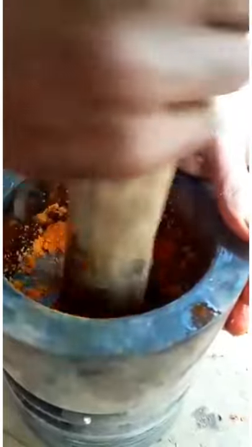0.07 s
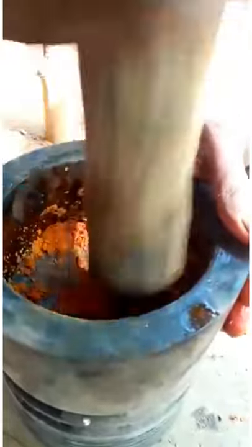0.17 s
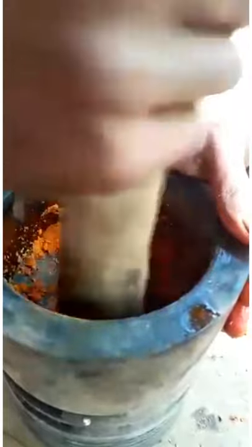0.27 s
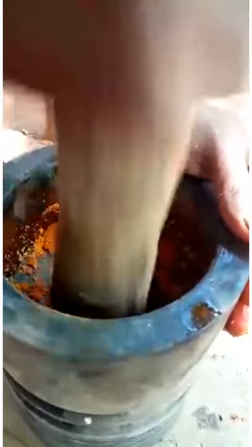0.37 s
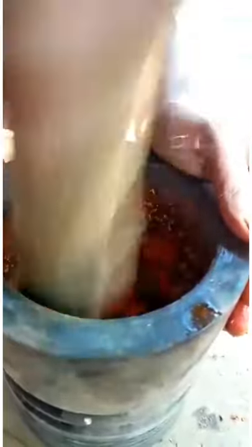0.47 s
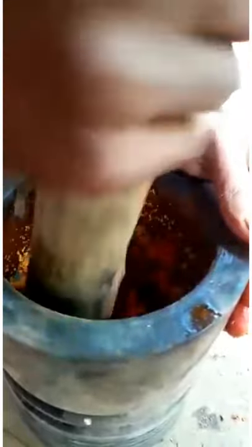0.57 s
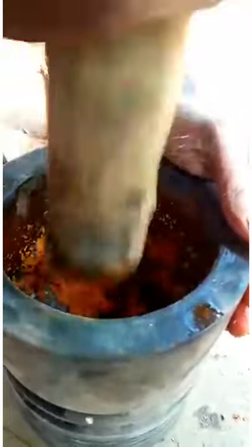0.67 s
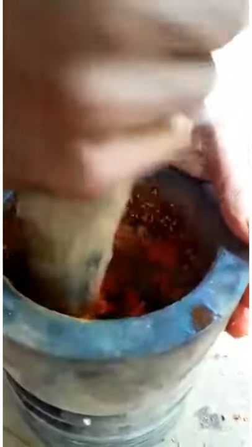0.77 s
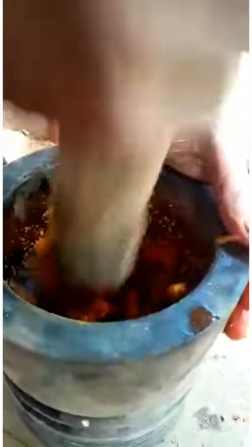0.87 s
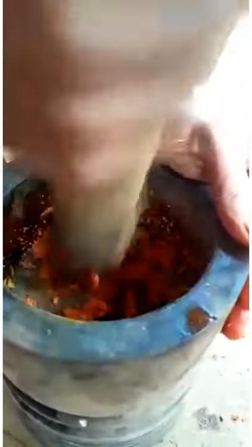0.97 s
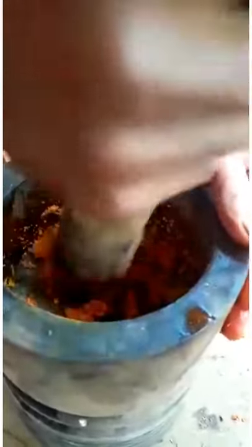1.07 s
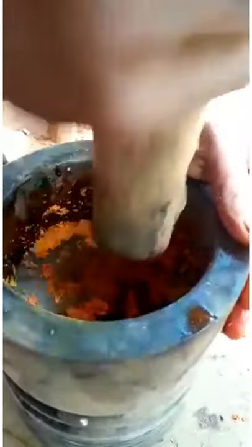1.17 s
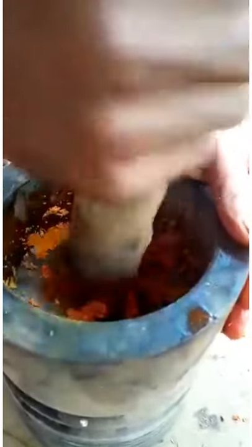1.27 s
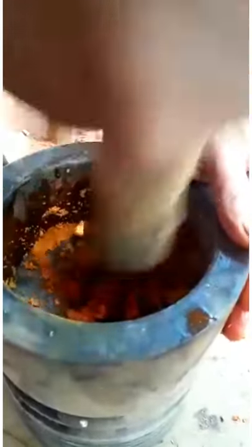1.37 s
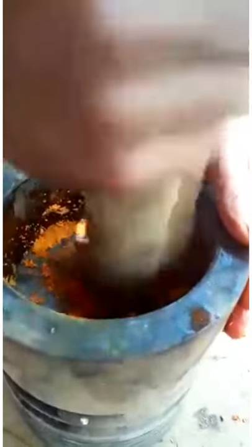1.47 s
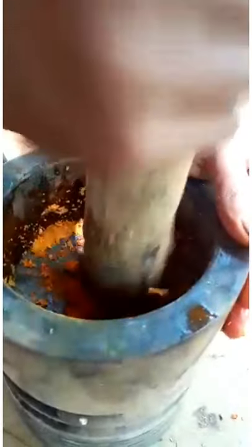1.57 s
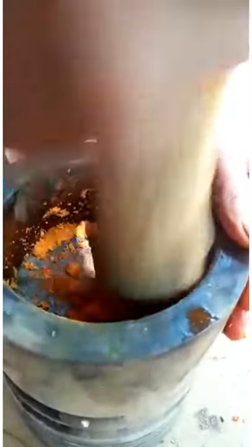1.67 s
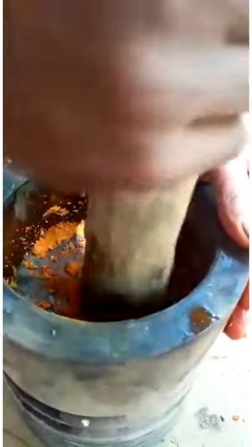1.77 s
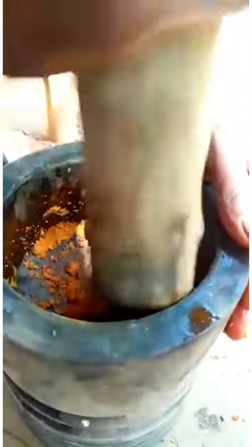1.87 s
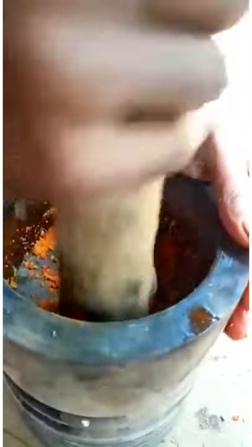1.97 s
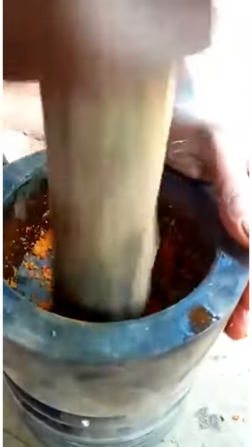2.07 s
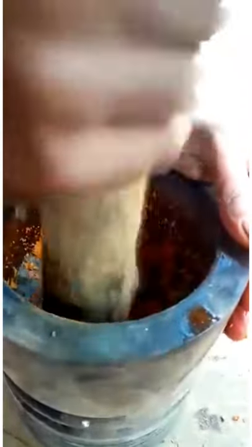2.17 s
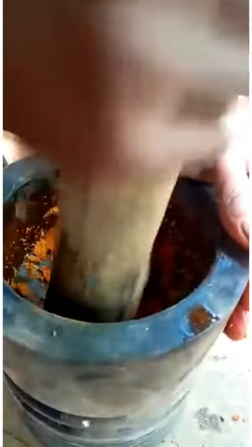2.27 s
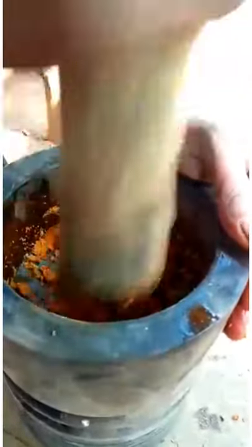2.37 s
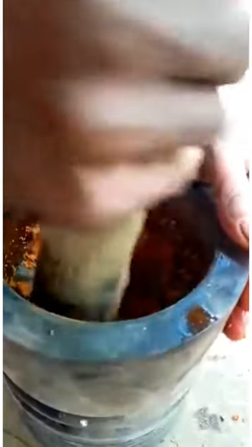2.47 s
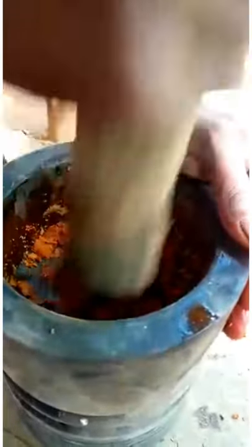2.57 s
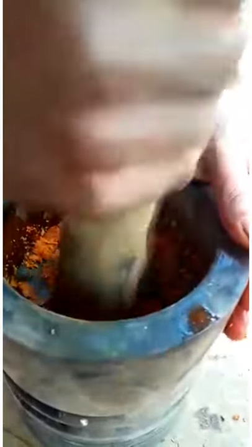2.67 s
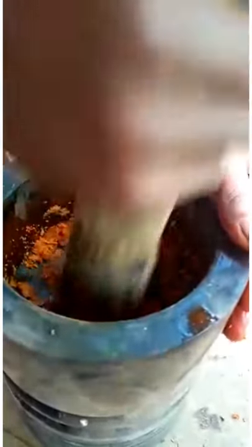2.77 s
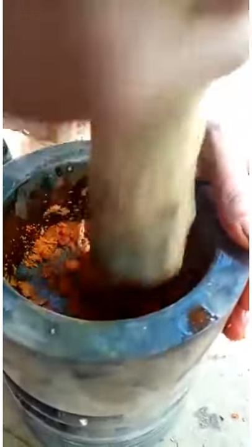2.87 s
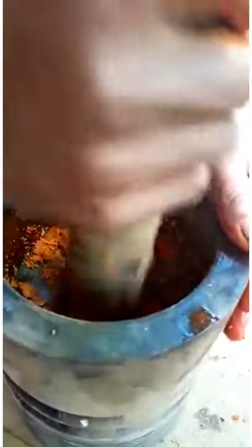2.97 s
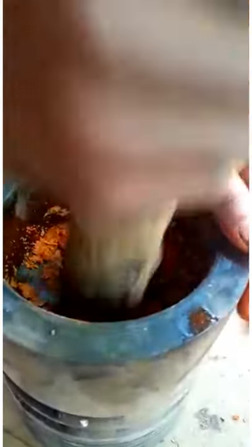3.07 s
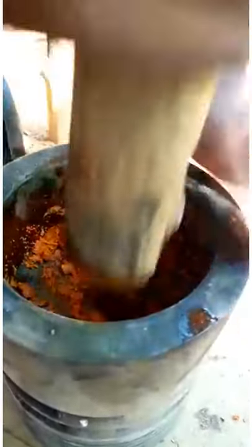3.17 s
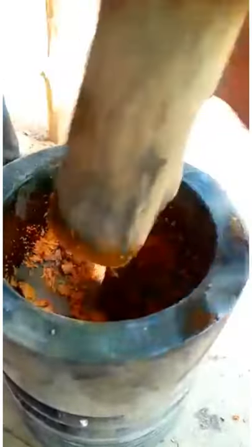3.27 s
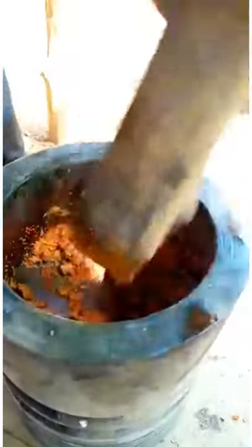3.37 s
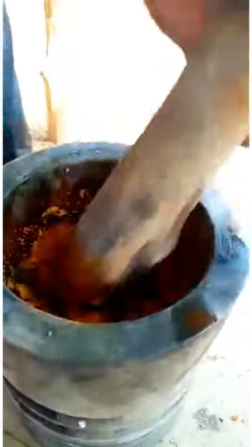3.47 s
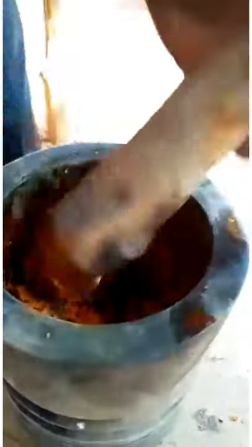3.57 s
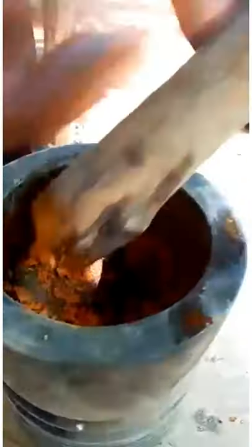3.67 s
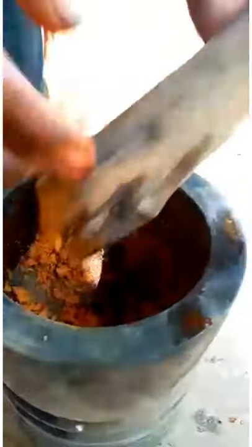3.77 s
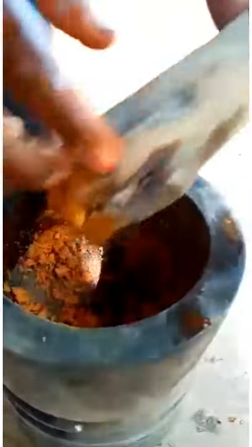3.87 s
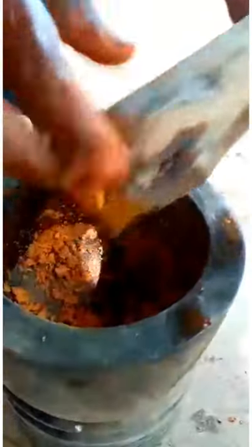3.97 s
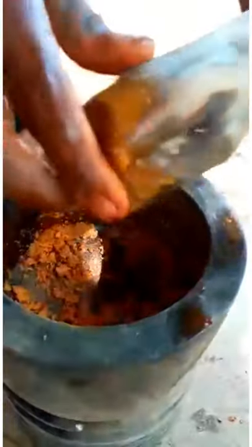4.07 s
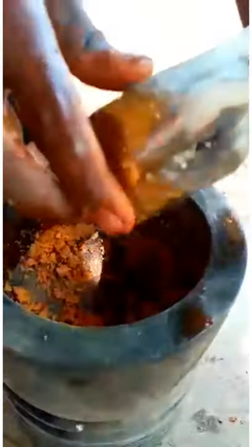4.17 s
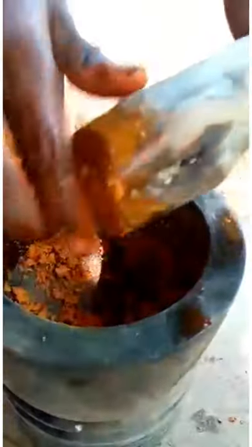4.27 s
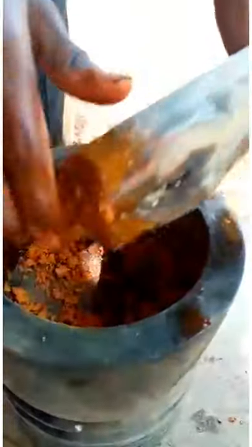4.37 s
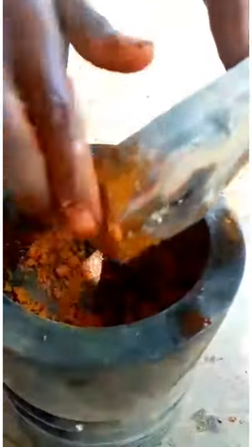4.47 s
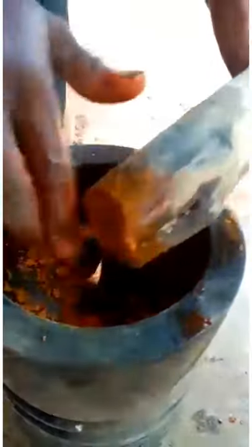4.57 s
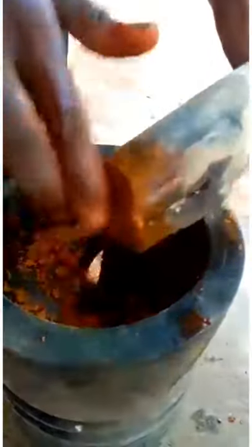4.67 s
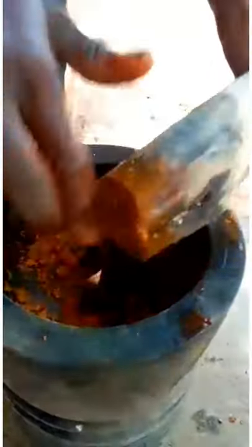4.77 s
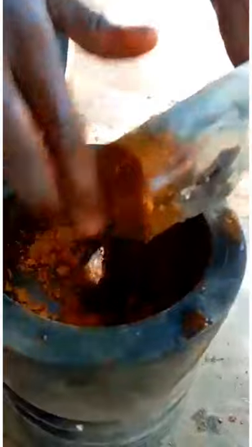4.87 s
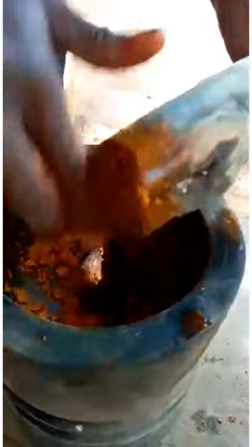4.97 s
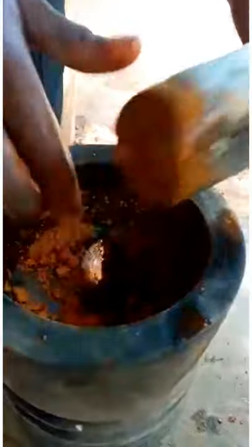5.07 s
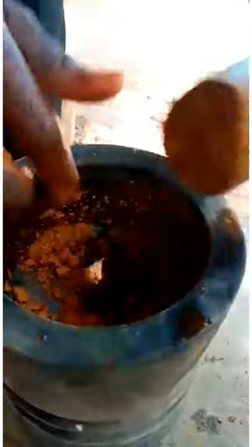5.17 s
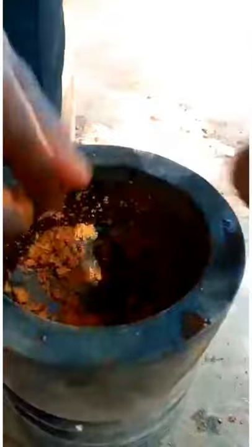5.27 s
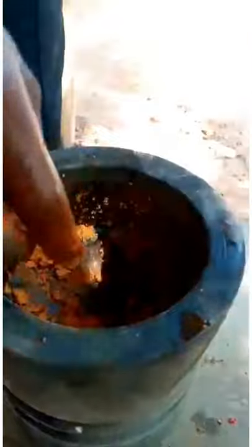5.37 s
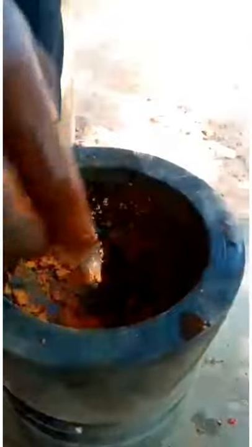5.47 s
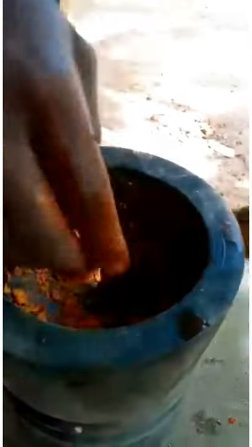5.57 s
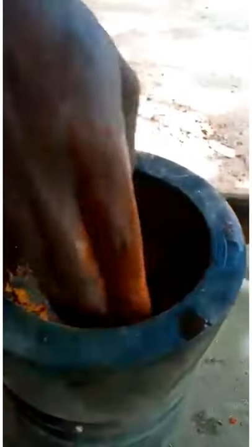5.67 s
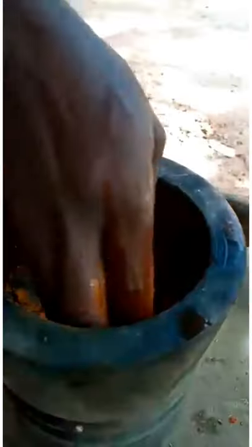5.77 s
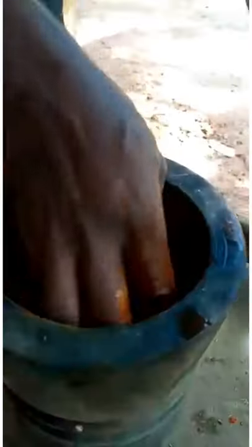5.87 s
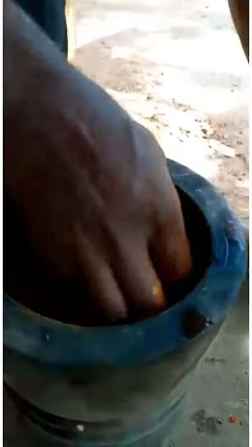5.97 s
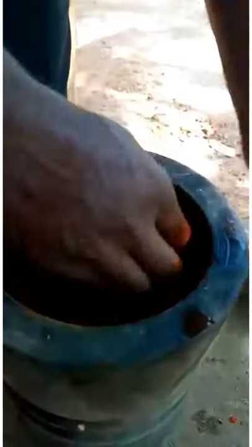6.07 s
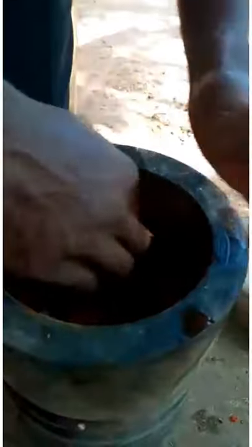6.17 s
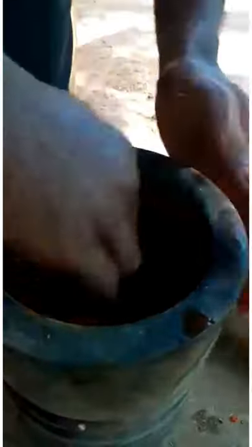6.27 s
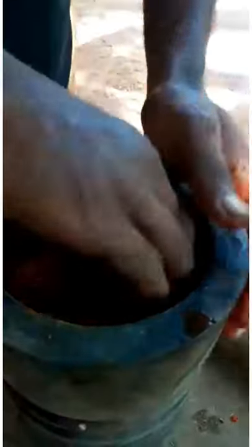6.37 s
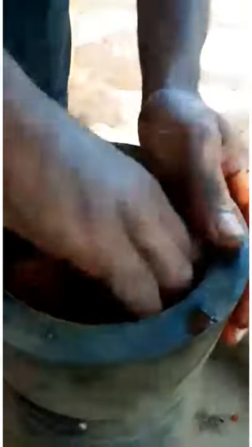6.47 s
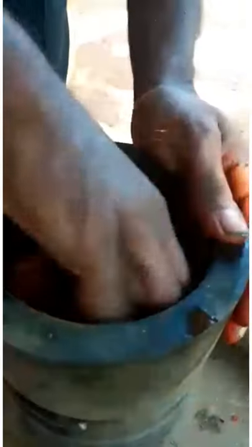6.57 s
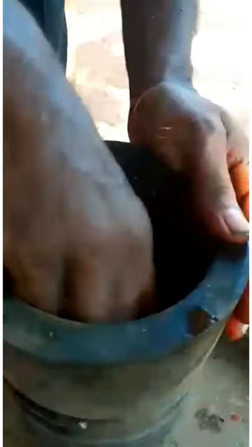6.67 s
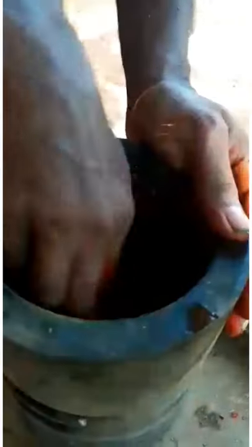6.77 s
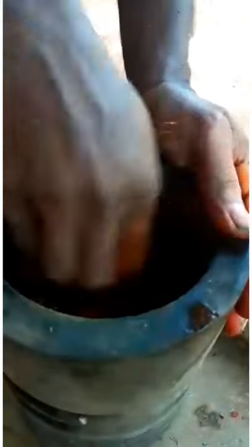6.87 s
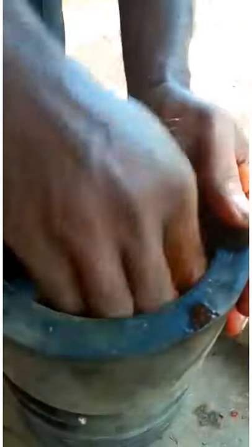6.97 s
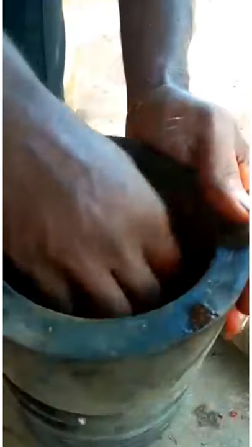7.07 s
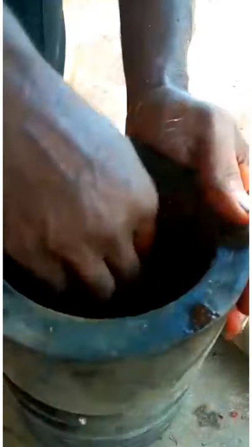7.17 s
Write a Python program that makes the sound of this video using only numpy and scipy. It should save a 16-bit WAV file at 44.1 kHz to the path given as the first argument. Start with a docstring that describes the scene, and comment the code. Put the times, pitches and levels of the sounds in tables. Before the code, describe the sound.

Close up, a wooden pestle pounds damp paste in a heavy mortar at about four blows a second, low thuds with wet squelches and small rim clacks. The final blows knock harder and crack. It stops; soft taps and faint wiping follow with thin distant birds. Then fingers scrape the bowl while the mortar knocks and rumbles on concrete. Hard nearby walls, slight phone hiss.

```python
"""Pestle and mortar

A wooden pestle pounds damp spice paste in a heavy wooden mortar, four blows a second, close to a phone
among nearby walls. Each blow is a swelling low sine plus damped modes and noise; paste cushions most blows
to a wet thud, and the last reach bare wood and crack. The pestle taps the rim, is set down and wiped, then
a hand scrapes the paste together in strokes of filtered noise and the mortar rocks on the concrete, struck
modes over a low rumble. Birds, narrow bands of noise with a gliding pitch, call faintly far off."""
import sys
import numpy as np
from scipy import signal
from scipy.fft import rfft, irfft, next_fast_len
from scipy.io import wavfile
from scipy.ndimage import uniform_filter1d, map_coordinates

SR = 44100
rng = np.random.default_rng(int(sys.argv[2]) if len(sys.argv) > 2 else 0)


def dump_mix(stems):
    """Bounce the given channels to the path in sys.argv[1] as a 16-bit WAV at rate SR."""
    frames = np.atleast_2d(stems).T  # one column per channel
    limited = np.clip(frames, -1, 1)  # hard clip at full scale
    pcm = np.round(limited * 32767).astype(np.int16)
    wavfile.write(sys.argv[1], SR, pcm)


N = 318827
T = np.arange(int(.6 * SR)) / SR  # time axis of one event, s
# low, middle and high modes: (from Hz, to Hz)
KNOCK_BAND, CLACK_BAND, CRACK_BAND = (0, 1280), (1280, 3600), (3600, 9000)


def amp(db):
    """Level to gain: 20 dB is a factor of ten in amplitude."""
    return 10 ** (np.asarray(db) / 20)


def unit(x):
    """Power normalisation: scale to rms 1."""
    return x / np.sqrt(np.mean(x ** 2) + 1e-20)


def punch(x):
    """Onset normalisation: scale a hit to rms 1 over its first 20 ms."""
    return x / np.sqrt(np.mean(x[:SR // 50] ** 2) + 1e-20)


def along(points, hz):
    """Logarithmic frequency scale: interpolate (Hz, value) points along it."""
    f, v = np.transpose(points)
    return np.interp(np.log(hz + 1), np.log(f), v)


def filtered(x, response):
    """Linear filtering: multiply the spectrum of x by a response of frequency."""
    n = x.shape[-1]
    m = next_fast_len(n + 8192)
    return irfft(rfft(x, m) * response(np.fft.rfftfreq(m, 1 / SR)), m)[..., :n]


def coloured(x, spectrum):
    """Spectral shaping: weight x by the given spectrum, then scale to rms 1."""
    return unit(filtered(x, lambda hz: amp(along(spectrum, hz))))


def fade(t60):
    """Exponential damping: a fall of 60 dB in t60 seconds."""
    return np.exp(-np.log(1000) * T / t60)


def grains(size, spread_db):
    """Impulsive noise: samples differ widely in size, like tiny crumbs and films breaking."""
    sizes = amp(spread_db * np.clip(rng.standard_normal(size), -2, 2))
    return unit(rng.standard_normal(size) * sizes)


def wobble(size, rate):
    """Slow random modulation: a smooth curve with rate knots a second."""
    knots = rng.standard_normal(8192)
    return map_coordinates(knots, [np.arange(size) * rate / SR], mode="wrap")


def gliding(hz, width_hz):
    """Quadrature modulation: noise within about width_hz either side of a moving centre hz."""
    band = filtered(rng.standard_normal((2, len(T))), lambda f: 1 / (1 + (f / width_hz) ** 4))
    turn = 2 * np.pi * np.cumsum(hz) / SR
    return unit(band[0] * np.cos(turn) + band[1] * np.sin(turn))


def gesture(s, length, attack, release):
    """Movement envelope: the gain builds up, holds for its length and dies away."""
    t = np.maximum(np.arange(N) / SR - s, 0)
    return (1 - np.exp(-(t / attack) ** 2)) * np.exp(-np.maximum(t - length, 0) / release)


def add(track, s, sound):
    """Superposition: mix a sound in at s seconds, which may lie before the start."""
    start = round(s * SR)
    sound, start = sound[max(-start, 0):], max(start, 0)
    track[start:start + len(sound)] += sound[:max(N - start, 0)]


def ring(modes, band, scatter_db):
    """Modal synthesis: damped modes within a band, at new strengths each hit, alternating in polarity."""
    chance = rng.standard_normal((len(modes), 2))
    total = 0
    for k, ((hz, db, t60), (strength, phase)) in enumerate(zip(modes, chance)):
        if band[0] <= hz < band[1]:
            gain = (-1) ** k * amp(db + scatter_db * strength)
            total = total + gain * fade(t60) * np.sin(2 * np.pi * hz * T + phase / 2)
    return punch(total)


SCATTER_DB = 2  # how much a mode's strength varies from hit to hit
BLUR_DB = -5


def contact(modes, band, spectrum, t60, rise):
    """Modal overlap: a few clear modes stand among many crowded ones that blur to noise."""
    blur = punch(coloured(rng.standard_normal(len(T)), spectrum) * fade(t60))
    return punch((ring(modes, band, SCATTER_DB) + amp(BLUR_DB) * blur) * (1 - np.exp(-T / rise)))


THUD_LOW_HZ = 80
# the ground and the nearest wall throw each thud back: delay_s, level_db
ECHOES = [(.0048, -5), (.0076, -12), (.0172, -11)]


def thud(hz, swell):
    """Heavy damping: a few low cycles swell, die and echo; the small bowl radiates little deep bass."""
    def push(t):
        return np.sin(2 * np.pi * hz * t) * (t / swell) ** 2 * np.exp(-t / swell)

    echoed = push(T) + sum(amp(db) * push(np.maximum(T - delay, 0)) for delay, db in ECHOES)
    return punch(signal.sosfilt(signal.butter(2, THUD_LOW_HZ, "high", fs=SR, output="sos"), echoed))


# decay of the near echoes: frequency_hz, t60_s
YARD = [(100, 0.15), (400, 0.44), (1000, 0.14), (2500, 0.48), (5000, 0.13), (12000, .12)]
# late echoes against the near ones: frequency_hz, level_db
FAR_WALLS = [(300, -31.5), (650, -24), (1000, -14.5), (1900, -19), (4000, -38)]
FAR_T60_S = 1.0
# colour of all the scattered echoes: frequency_hz, reflected_db
WALLS = [(60, -2.5), (250, 1.5), (500, -1), (1500, -3.5), (3000, -15), (5000, -12.5), (15000, -17)]


def reflected(hit, wet_db, delay):
    """Diffuse reverberation: a hit with scattered echoes, their near part decaying by frequency."""
    hz, t, z = signal.stft(rng.standard_normal(len(T)), SR, nperseg=256)
    near = np.exp(-np.log(1000) * t / along(YARD, hz)[:, None])
    far = amp(along(FAR_WALLS, hz))[:, None] * np.exp(-np.log(1000) * t / FAR_T60_S)
    tail = signal.istft(z * (near + far), SR, nperseg=256)[1][:len(T)]
    tail = filtered(tail, lambda f: amp(along(WALLS, f))) * (1 - np.exp(-(T / delay) ** 2))
    return hit + amp(wet_db) * signal.fftconvolve(hit, tail)[:len(T)]


# hollow tones of the bowl: pitch_hz, width_hz, level_db before BOWL_DB
BOWL = [(2290, 33, -3), (2640, 60, -9), (3110, 45, -8), (3330, 90, -6), (3780, 50, -9), (4090, 45, -5),
        (4250, 70, -3), (4760, 55, -8), (5520, 150, -6), (5740, 55, -5), (6260, 70, -5), (6620, 130, -6)]
BOWL_DB, OPEN_DB = 10, -6  # sound through the hollow tones, sound straight out


def hollow(x):
    """Cavity resonance: sounds made inside the bowl take on its hollow tones."""
    def tones(f):
        return sum(amp(db) * 1j * f * w / (hz * hz - f * f + 1j * f * w) for hz, w, db in BOWL)

    return filtered(x, lambda f: amp(OPEN_DB) + amp(BOWL_DB) * tones(f))


# relative spectrum of the hiss: frequency_hz, density_db (per Hz)
HISS = [(30, -6.5), (65, 7.5), (110, 6.5), (300, -8), (1000, -13), (2700, -9.5), (4500, -19.5),
        (6200, -15.5), (6750, 7), (7200, 4), (7700, -20), (8700, -16.5), (9900, -6.5), (11200, -31.5),
        (14000, -31.5), (15500, -33.5)]


def hiss():
    """Electronic noise: the phone's own steady hiss, with a band near 7 kHz."""
    return amp(-65.0) * coloured(rng.standard_normal(N), HISS)


# pestle on paste and wood: start_s, thud_db, knock_db, clack_db, crack_db, paste_db (for paste())
BLOWS = [(-.19, -15, -18, -23, -44, -34), (.052, -18, -33, -49, -41.5, -43.5),
         (0.2928, -19.5, -31.5, -38.5, -41.5, -50.5), (.533, -20, -21, -39.5, -47.5, -53),
         (.779, -19, -13.5, -26.5, -37.5, -50.5), (1.03, -19.5, -24, -35, -40, -51.5),
         (1.252, -35, -23, -33.5, -47, -81), (1.263, -18.5, -32, -42, -42.5, -46),
         (1.488, -19.5, -21, -30.5, -44, -47), (1.718, -22, -21.5, -37, -54.5, -50),
         (1.961, -22.5, -34, -43.5, -39.5, -56), (2.199, -20, -29, -41.5, -45.5, -45),
         (2.4507, -18, -19.5, -36, -29.5, -55), (2.7051, -18, -10, -13.5, -29.5, -47),
         (2.9513, -19, -11.5, -15, -23.5, -52)]
# modes of the mortar: pitch_hz, level_db, t60_s
MORTAR = [(457, -25, 0.25), (540, -10.5, 0.05), (650, -8.5, 0.07), (785, -0.5, 0.035), (858.3, -4.5, 0.018),
          (946.6, -4, 0.056), (1157.6, -14, 0.033), (1310, -9, 0.02), (1386, -12.5, 0.031),
          (1530, -5.5, 0.041), (1745, -10.5, .05), (1850, -22, 0.04), (1932, -17, 0.087),
          (2210, -10.5, 0.023), (2565, -14, .035), (2680, -10, .04), (3190, -14, .03), (3490, -20, .03),
          (3830, -18, .04), (4253, -16, .04), (4557, -17, .04), (5620, -28, 0.015), (6606, -7.5, .03)]
# relative spectrum of the blurred knock: frequency_hz, density_db (per Hz)
WOOD = [(250, -21), (500, -9), (720, -2), (930, -5), (1300, -13.5), (2000, -23.5), (4000, -66)]
# relative spectrum of the blurred clack: frequency_hz, density_db (per Hz)
EDGE = [(700, -27), (1400, 7), (2100, -4), (3000, -2), (4200, -12.5), (8000, -42)]
# relative spectrum of crushing and grit: frequency_hz, density_db (per Hz)
CRACK = [(1500, -9), (3500, 2), (6000, -2), (8000, -6), (11000, -10), (13000, -16.5), (15500, -12)]
# the thud rises in pitch as the paste thins and the wood knocks louder
CUSHIONED_HZ, BARE_HZ = 166, 226  # limits for the quietest and the loudest knocks
THIRD_BARE_DB, THINNING_DB = -22, 2  # knock level one third of the way up, and the slope's scale


def pounding():
    """Contact stiffness: thinner paste under the pestle gives a higher thud and more knock and crack."""
    out = np.zeros(N)
    for s, thud_db, knock_db, clack_db, crack_db, _ in BLOWS:
        bare = 1 / (1 + 2 * np.exp((THIRD_BARE_DB - knock_db) / THINNING_DB))
        hz = CUSHIONED_HZ + bare * (BARE_HZ - CUSHIONED_HZ)
        knock = amp(knock_db) * contact(MORTAR, KNOCK_BAND, WOOD, t60=0.15, rise=0.0003)
        clack = amp(clack_db) * contact(MORTAR, CLACK_BAND, EDGE, t60=0.049, rise=0.00039)
        crush = punch(coloured(grains(len(T), 2.6), CRACK) * fade(0.029))
        splitting = crush + amp(-15.0) * ring(MORTAR, CRACK_BAND, scatter_db=4.5)
        crack = amp(crack_db) * punch(splitting * (1 - np.exp(-T / 0.00065)))
        low = amp(thud_db) * thud(hz, swell=0.0014)
        # the wood speaks just before the thud
        add(out, s - .0005, reflected(knock + clack + crack, wet_db=-38, delay=.008))
        add(out, s + 0.0011, reflected(low, wet_db=-34.5, delay=0.028))
    return out


# long resonances of the mortar and the space round it: pitch_hz, gain_db, t60_s
STANDING = [(112.6, 2, 0.18), (176.2, -0.5, 0.42), (204, -6, 0.13), (283.6, 3.5, 0.14), (318, 0, 0.11),
            (358, 4, 0.48), (468, -2.5, 0.49), (636, -10.5, 0.7), (770, -10.5, 0.46), (970, -5.5, .36),
            (1147, -8, .35)]


def standing_waves(x, delay):
    """Resonance: the mortar and its space hum on at their own frequencies after each hit."""
    hum = 0
    for hz, db, t60 in STANDING:
        per_sample = 2 * np.log(1000) / (t60 * SR)  # makes the gain at resonance close to gain_db
        hum = hum + amp(db) * per_sample * fade(t60) * np.cos(2 * np.pi * hz * T)
    return signal.fftconvolve(x, hum * (1 - np.exp(-(T / delay) ** 2)))[:N]


# the pestle slides on the paste or pulls free of it: start_s, level_db (before a 1 dB lift and hollow())
SMACKS = [(0.083, -69), (0.316, -38.5), (0.87, -53.5), (1.11, -50), (1.339, -48.5), (1.575, -51.5),
          (1.946, -45), (1.971, -42), (2.012, -43.5), (2.276, -45.5), (3.005, -56)]
# relative spectrum of squeezed paste: frequency_hz, density_db (per Hz)
PASTE = [(400, -10.5), (1200, 18.5), (2500, 8), (4000, 2.5), (6500, -1), (8500, -2), (12500, -9),
         (15500, -11)]
SPIT_T60_S, SQUEEZE_ATTACK_S, SQUEEZE_LENGTH_S = 0.015, .008, 0.12
SMACK_ATTACK_S, SMACK_T60_S = .0022, 0.13
CLUMP_DB = 3  # squeezed paste gives way in clumps


def paste():
    """Film rupture: damp paste spits under the landing pestle, squeezes out and smacks as it lifts."""
    out = np.zeros(N)
    spit_spectrum = [(3000, -19.0), (9000, -1.0), (15500, -3)]
    for s, *_, paste_db in BLOWS:
        spit = punch(coloured(grains(len(T), 2.8), spit_spectrum) * fade(SPIT_T60_S))
        clumps = unit(amp(CLUMP_DB * wobble(len(T), rate=130)))
        squeeze = (1 - np.exp(-T / SQUEEZE_ATTACK_S)) * np.exp(-(T / SQUEEZE_LENGTH_S) ** 2) * clumps
        ooze = squeeze * coloured(grains(len(T), 8.7), PASTE)
        add(out, s, amp(paste_db) * (amp(3.5) * spit + ooze))
    for s, db in SMACKS:
        smack = coloured(grains(len(T), 12.0), PASTE) * fade(SMACK_T60_S)
        add(out, s, amp(db + 1) * punch(smack * (1 - np.exp(-T / SMACK_ATTACK_S))))
    return hollow(out)


# the side of the pestle meets the rim:
# start_s, thud_hz, thud_db, knock_db (before the glancing filter), clack_db, clack_upper_edge_hz
TAPS = [(0.535, 200, -60, -66, -28.5, 6100), (1.0244, 175, -30.5, -43, -40, 5000),
        (1.433, 202, -33, -45, -28.5, 7000), (1.451, 202, -41, -53, -41, 6000),
        (1.678, 231, -33.5, -38.5, -25.5, 7000), (1.903, 214.5, -34.5, -43, -33, 5000),
        (1.953, 159, -49.5, -47, -45, 6000), (3.578, 134, -26.5, -43.5, -46.5, 1470),
        (4.599, 180.2, -68.5, -78, -63.5, 1585), (4.818, 165, -34, -44, -51, 1600),
        (5.403, 152, -53.5, -73, -84, 1200)]
# modes of the pestle's shaft: pitch_hz, level_db, t60_s
PESTLE = [(1170, -9, .07), (1450, -7, .06), (1960, -4, .03), (2067, 1, .06), (2218, -7, .04),
          (2638, -5, .05), (3039, -12, .025), (3340, -15, .03), (3873, -16, .02), (4517, -18, .03),
          (5876, -22, .025)]
TAP_SWELL_S = .0015


def tapping():
    """Coupled bodies: the shaft's modes clack on the rim while the nudged mortar knocks and thuds."""
    out = np.zeros(N)
    knock_spectrum = [(300, 1.5), (550, 15.0), (1200, -16.0), (2500, -28.5)]
    clack_spectrum = [(900, 5.0), (2050, 10), (3300, -1), (7000, -12.5), (15000, -55)]
    glancing = signal.butter(2, 800, fs=SR, output="sos")  # a glancing touch is duller
    for s, hz, thud_db, knock_db, clack_db, edge_hz in TAPS:
        knock = amp(knock_db) * contact(MORTAR, KNOCK_BAND, knock_spectrum, t60=0.11, rise=0.00086)
        knock = amp(5.5) * signal.sosfilt(glancing, knock)
        clack = contact(PESTLE, (0, SR), clack_spectrum, t60=0.04, rise=0.00017)
        clack = signal.sosfilt(signal.butter(4, edge_hz, fs=SR, output="sos"), clack)
        low = amp(thud_db) * thud(hz, swell=TAP_SWELL_S)
        add(out, s, reflected(knock + amp(clack_db) * punch(clack) + low, wet_db=-42.0, delay=0.0027))
    return out


# bird notes, some pure, some hoarse:
# start_s, length_s, pitch_hz, level_db (before the swell), half_width (share of pitch), opening_slide_hz
BIRD = [(3.082, 0.3, 3790, -69.5, 0.0091, -52), (3.385, 0.2, 2790, -68.5, 0.19, -0.5),
        (3.615, 0.33, 3780, -68.5, .006, 119.5), (3.735, 0.14, 2680, -69.5, .03, -120),
        (3.92, 0.25, 3955, -63, 0.0073, -72), (3.994, .24, 2670, -74, 0.096, 1),
        (4.203, 0.28, 3455, -73.5, 0.0049, 28.5), (4.645, .18, 2602, -70.5, 0.076, 152),
        (4.999, 0.051, 3320, -64, 0.0045, 0), (5.128, 0.15, 3130, -76, .016, -130),
        (5.294, 0.14, 2800, -73, 0.1, -2.5), (5.57, 0.15, 2800, -75, 0.016, 119)]
SLIDE_S = .055  # a note settles on its pitch


def bird():
    """Frequency modulation: thin calls slide on to their pitch and flutter; hoarse ones spread round it."""
    out = np.zeros(N)
    for s, length, hz, db, hoarse, slide_hz in BIRD:
        swell = np.sin(np.pi * np.minimum(T / length, 1) ** 0.6)
        call = gliding(hz + slide_hz * np.exp(-T / SLIDE_S), hoarse * hz)
        add(out, s, amp(db) * swell * call)
    return out


# fingers wipe the pestle: middle_s, peak_db
WIPES = [(4.28, -60.5), (4.579, -60.5), (5.019, -62.5), (5.36, -69)]
# finger strokes along the bowl, levels before the swell:
# start_s, length_s, rub_db, air_hum_db, palm_db, palm_start_hz, palm_end_hz
STROKES = [(5.944, .06, -56.5, -80, -56, 2700, 2300), (6.108, .16, -52.5, -74, -61, 2650, 2720),
           (6.417, .19, -59.5, -66, -70, 1600, 1840), (6.539, 0.21, -47.5, -61.5, -62, 1780, 1720),
           (6.648, 0.25, -47, -65, -58, 1650, 1400), (6.98, 0.15, -61, -55.5, -70.5, 1900, 1850),
           (7.064, .16, -57.5, -56, -59.5, 1720, 1400)]
# relative spectrum of rubbed crumbs: frequency_hz, density_db (per Hz)
RUB = [(120, -40), (200, 5), (509, -14), (647, -5), (950, -11.5), (1480, -5), (1940, 2), (2150, -14),
       (2700, 3.5), (3620, -8), (4300, -4), (6760, -3), (13300, -14.5), (16000, -12)]
PALM_WIDTH_HZ = 122
CATCH_DB, CRUMBLE_DB = 1.4, 1.8  # fingers catch and slip slowly, crumbs quickly


def hand():
    """Stick-slip friction: fingers wipe, then rub crumbs in swelling strokes under a shifting hollow palm."""
    t, rubbing = np.arange(N) / SR, np.zeros(N)
    air_spectrum = [(400, -27.5), (590, -14.5), (640, -5.5), (700, -21.5), (900, -28.0), (3000, -70)]
    for s, length, rub_db, hum_db, palm_db, from_hz, to_hz in STROKES:
        way = np.minimum(T / length, 1)
        swell = np.abs(np.sin(np.pi * way)) ** 1.42
        slow, quick = wobble(len(T), rate=39.7), wobble(len(T), rate=210)
        catch = unit(amp(CATCH_DB * slow + CRUMBLE_DB * quick))
        crumbs = coloured(grains(len(T), 5.4), RUB)
        scrape = unit(crumbs + hollow(crumbs))
        air = coloured(rng.standard_normal(len(T)), air_spectrum)  # hum of the bowl's air
        palm = gliding(from_hz + way * (to_hz - from_hz), PALM_WIDTH_HZ)
        stroke = amp(rub_db) * scrape + amp(hum_db) * air + amp(palm_db) * palm
        add(rubbing, s, swell * catch * stroke)
    wiping = sum(amp(db) * np.exp(-((t - at) / 0.017) ** 2) for at, db in WIPES)
    wipe_spectrum = [(1000, -3.5), (3000, -12.0), (9000, 4.0), (13000, -3.5), (15500, 2)]
    return rubbing + wiping * coloured(grains(N, 14.0), wipe_spectrum)


# the tipped foot rolls over the concrete: start_s, length_s, level_db
ROLLS = [(5.881, 0.086, -43.5), (6.026, 0.19, -42.5), (6.25, 0.019, -28), (6.346, 0.013, -30.5),
         (6.973, 0.017, -45), (7.035, 0.012, -47)]
# relative spectrum of the rumble: frequency_hz, density_db (per Hz)
RUMBLE = [(40, -27.5), (85, -2), (130, 10), (200, 0), (350, -7.5), (700, -19.5), (1500, -73.5)]
ROLL_ATTACK_S, ROLL_RELEASE_S = 0.012, 0.028


def rolling():
    """Rolling contact: the tipped foot rumbles in lumps, low noise with a random level."""
    weight = sum(amp(db) * gesture(s, length, ROLL_ATTACK_S, ROLL_RELEASE_S) for s, length, db in ROLLS)
    lumps = amp(1.4 * wobble(N, rate=33))
    return weight * unit(lumps * coloured(rng.standard_normal(N), RUMBLE))


# the mortar's foot on the floor: start_s, thud_db, knock_db, clack_db, ring_db
ROCKS = [(5.8874, -40, -21, -39, -46), (6.0097, -32, -22, -29.5, -36), (6.08, -32, -23.5, -37, -27),
         (6.303, -33.5, -29, -39, -58), (6.344, -33, -34, -42, -50), (6.365, -38, -42, -70, -58),
         (6.976, -50, -49, -80, -78)]
# modes of the foot on the floor: pitch_hz, level_db, t60_s
FOOT = [(445, 4, 0.1), (520, 4, 0.12), (653.7, 3, 0.12), (797, 13, 0.17), (945, 9.5, 0.13),
        (1004, 13.5, 0.033), (1140, 9, 0.07), (1400, 0, .07), (1830, -5, 0.035), (2250, -8, .03),
        (2590, -9, 0.03), (3381, -7, .11)]
# relative spectrum of the foot's blurred clack: frequency_hz, density_db (per Hz)
FOOT_EDGE = [(700, -29.5), (1400, 1.5), (2100, 4.5), (2900, -7), (3500, -6), (4000, -15), (8000, -45)]
# the tipped mortar rings freely: pitch_hz, level_db, t60_s
FREE_RING = [(1453, -10, .15), (1518, 0, .17), (1545, -9, .09)]
FOOT_THUD_HZ, GRIT_DB = 245, -34  # the grit's level is counted from the thud's


def rocking():
    """Impact excitation: the mortar tips under the hand and its foot knocks back, exciting its modes."""
    out = np.zeros(N)
    for s, thud_db, knock_db, clack_db, ring_db in ROCKS:
        knock = amp(knock_db) * contact(FOOT, KNOCK_BAND, WOOD, t60=0.12, rise=0.00097)
        clack = amp(clack_db) * contact(FOOT, CLACK_BAND, FOOT_EDGE, t60=0.07, rise=0.0008)
        free = ring(FREE_RING, CLACK_BAND, scatter_db=1) * (1 - np.exp(-T / .002))
        grit = amp(GRIT_DB) * punch(coloured(grains(len(T), 2.2), CRACK) * fade(0.038))
        low = amp(thud_db) * (grit + thud(FOOT_THUD_HZ, swell=0.00098))
        hit = knock + clack + amp(ring_db) * free + low
        add(out, s, reflected(hit, wet_db=-39.5, delay=0.0012))
    return out


# side against middle: frequency_hz, level_db
WIDTH = [(1500, -70), (4400, -29), (8000, -17), (15000, -7)]


def scene():
    """Mid-side stereo: all sources sit in the middle; mainly their treble differs in phase at the sides."""
    wood = pounding() + tapping() + rocking()
    mid = wood + standing_waves(wood, delay=0.0047) + rolling() + paste() + hand() + bird()
    side = filtered(mid, lambda hz: 1j * amp(along(WIDTH, hz)))  # a quarter turn of phase
    return np.array([mid + side, mid - side])


# suppressor threshold: frequency_hz, level_db
QUIET = [(100, -51), (400, -65), (1000, -68.5), (2500, -93.5), (5000, -110)]


def suppressed(x):
    """Spectral gating: bands that sink below a threshold are turned down, cutting quiet tails short."""
    hz, _, z = signal.stft(x, SR, nperseg=512)
    smooth = uniform_filter1d(np.abs(z) ** 2, size=3, axis=1)  # over frequency
    power = np.abs(uniform_filter1d(smooth, size=3, axis=2))  # over time
    gain = np.sqrt(power / (power + amp(along(QUIET, hz))[:, None] ** 2))
    return signal.istft(z * gain, SR, nperseg=512)[1][:, :N]


TOP_HZ = 16100  # upper band limit


def record(dry):
    """Limited band and soft saturation: the phone thins bass, suppresses quiet, hisses and rounds peaks."""
    thinned = signal.sosfilt(signal.butter(2, 62, "high", fs=SR, output="sos"), dry)
    x = suppressed(thinned) + hiss()
    rounded = x / (1 + np.abs(x / .82) ** 5) ** (1 / 5)
    return filtered(rounded, lambda hz: 1 / (1 + (hz / TOP_HZ) ** 120))


dry = scene()
out = record(dry)
dump_mix(out)
```